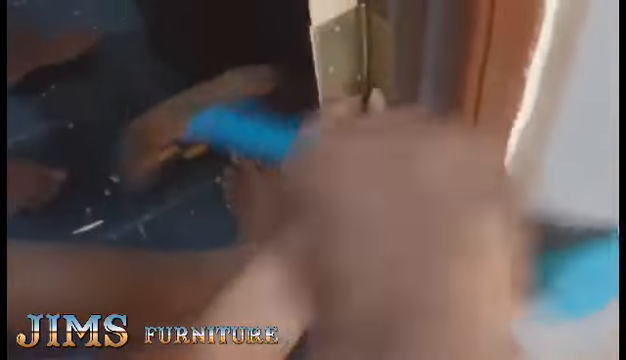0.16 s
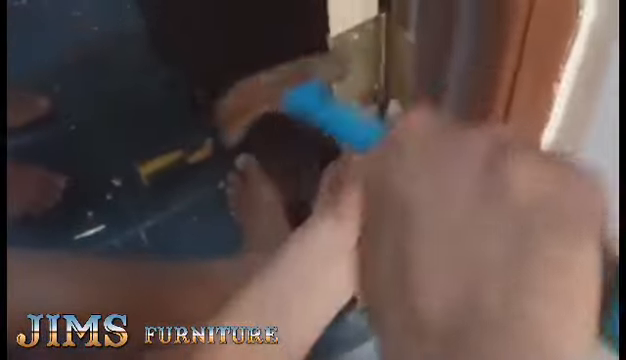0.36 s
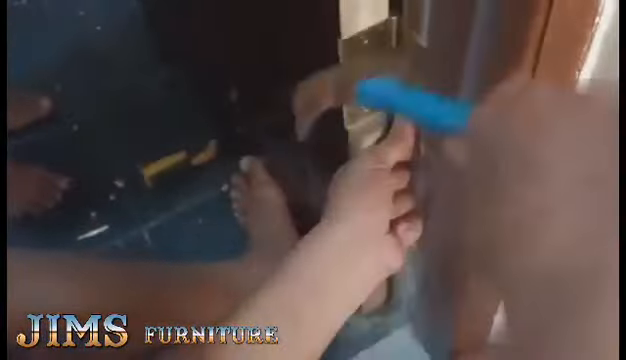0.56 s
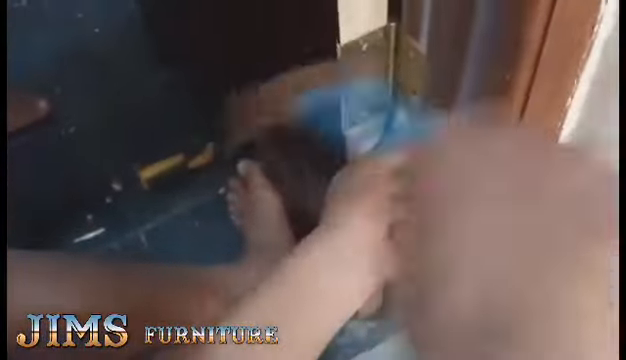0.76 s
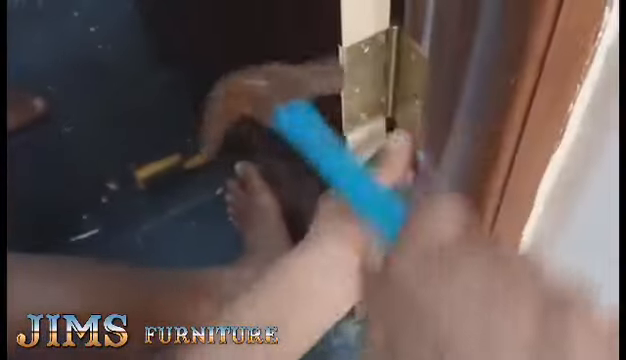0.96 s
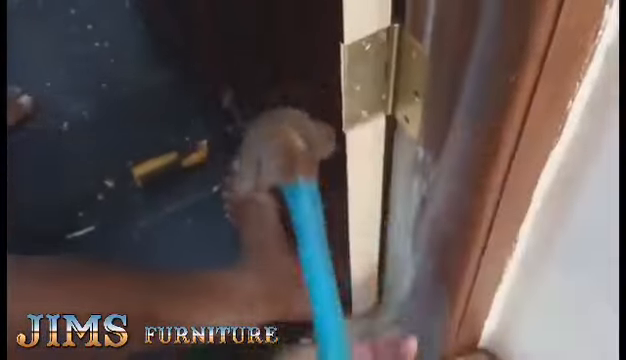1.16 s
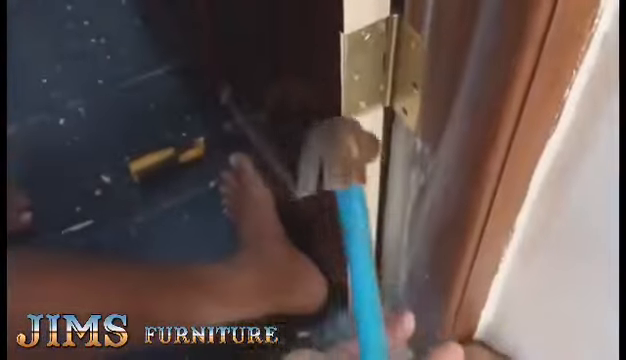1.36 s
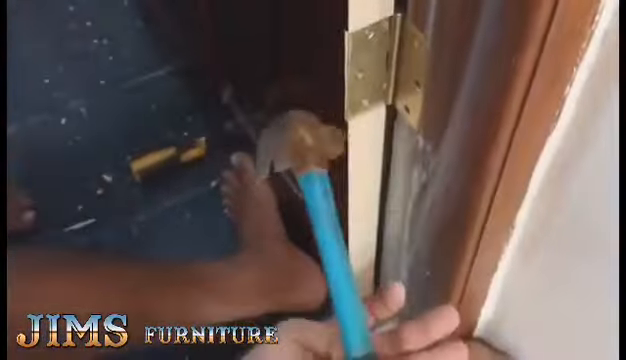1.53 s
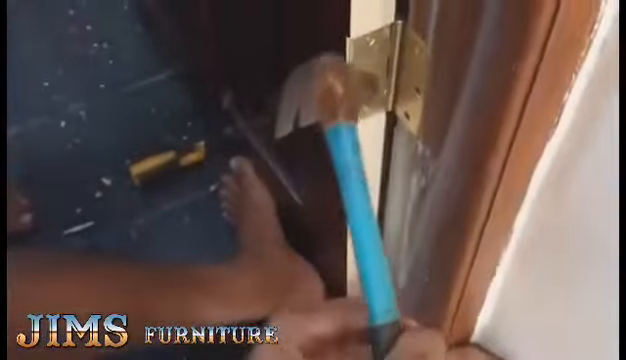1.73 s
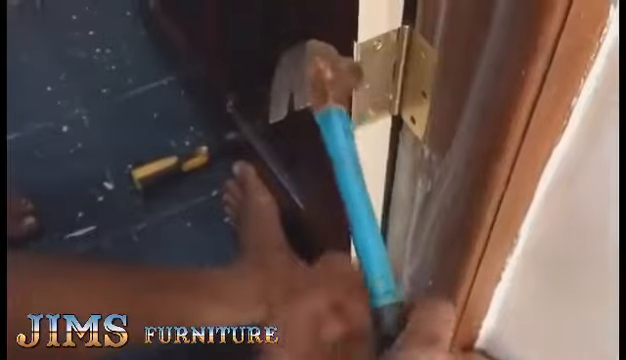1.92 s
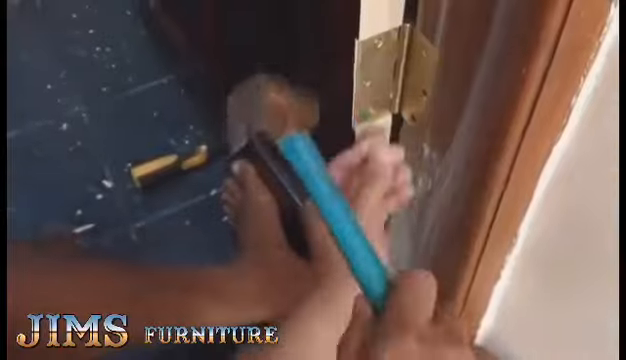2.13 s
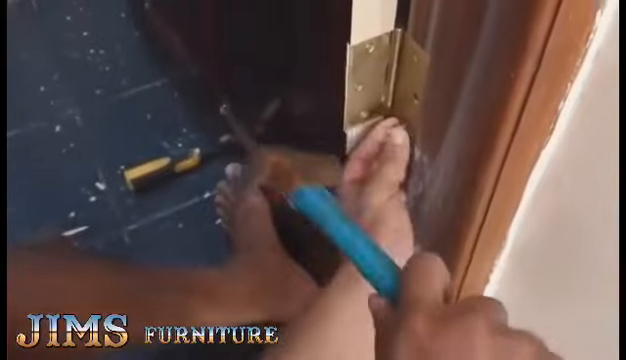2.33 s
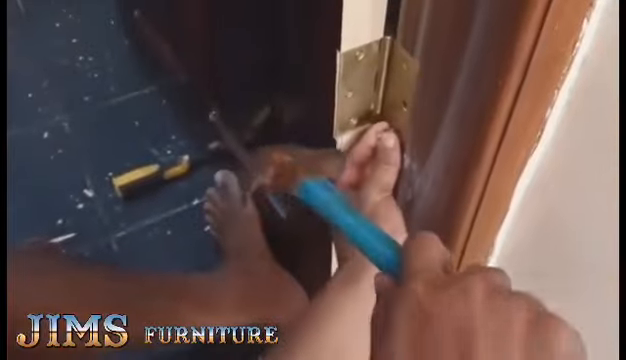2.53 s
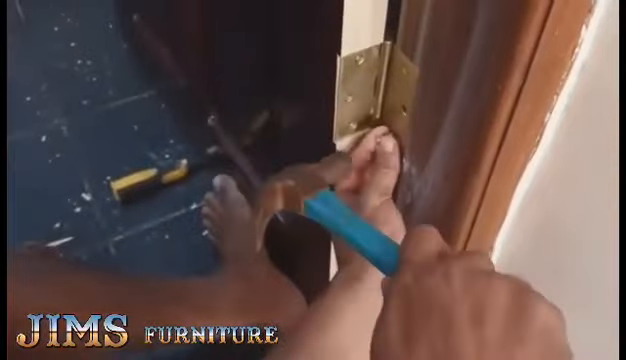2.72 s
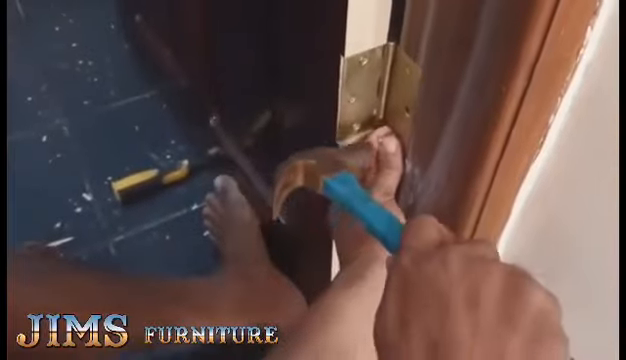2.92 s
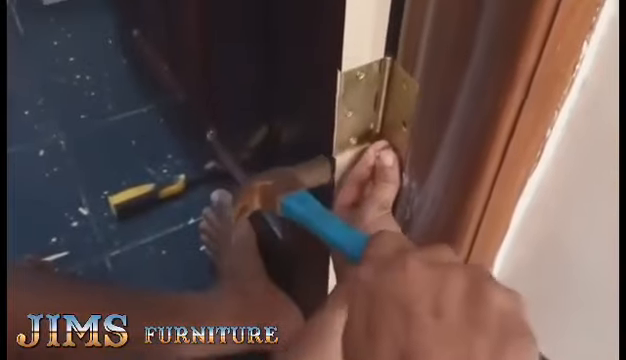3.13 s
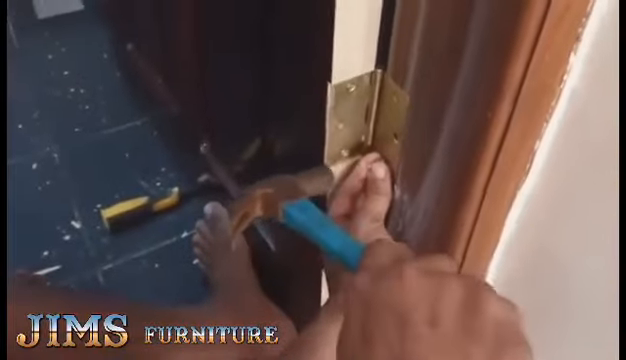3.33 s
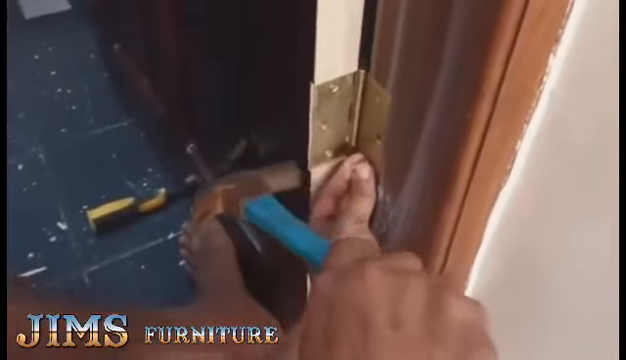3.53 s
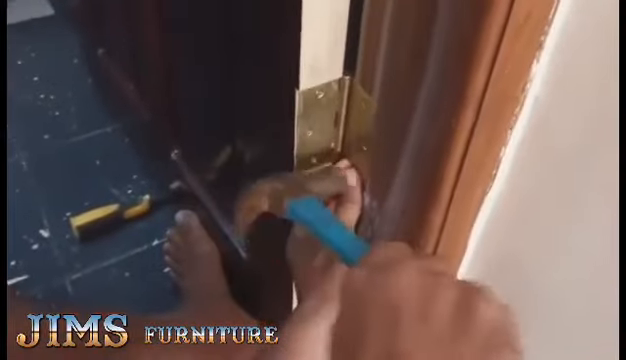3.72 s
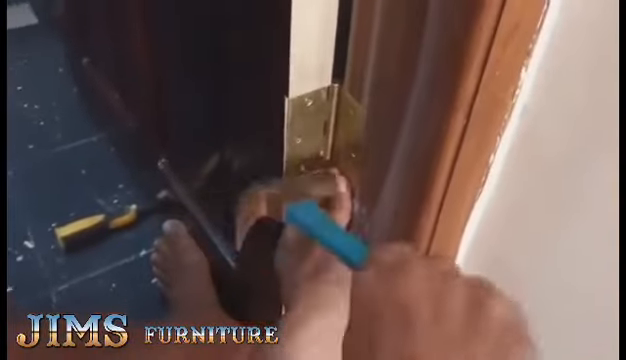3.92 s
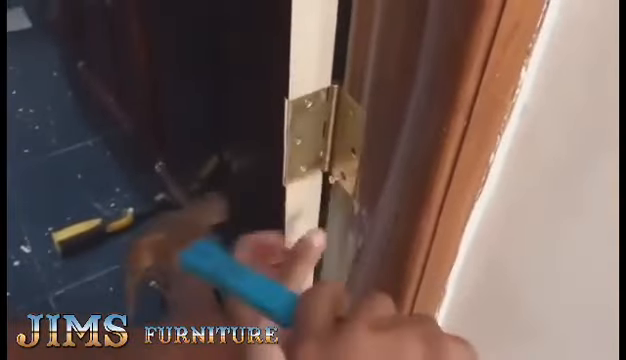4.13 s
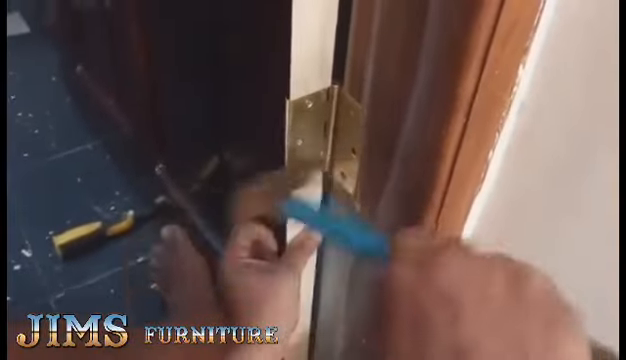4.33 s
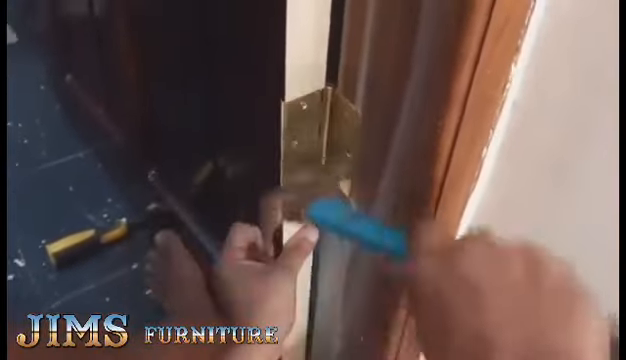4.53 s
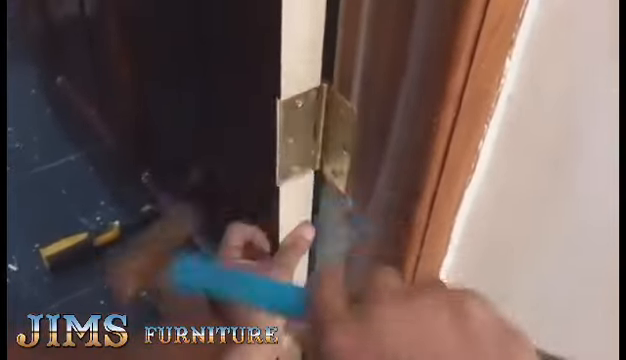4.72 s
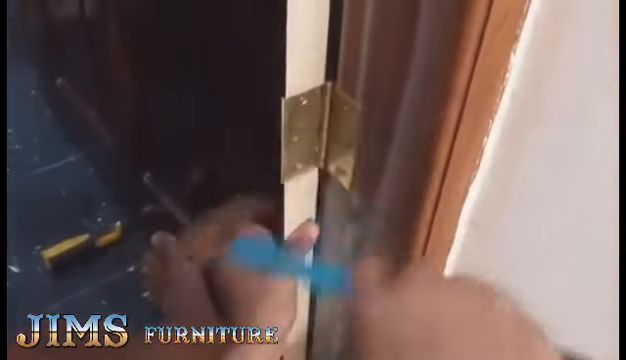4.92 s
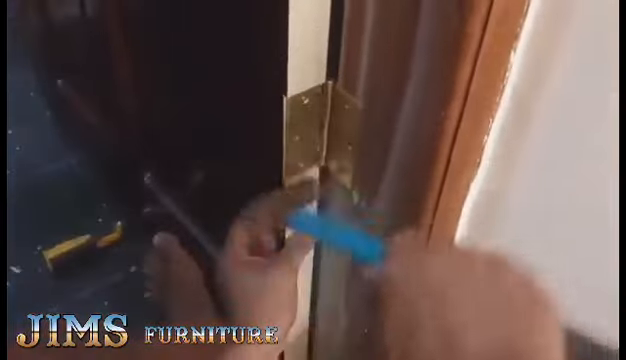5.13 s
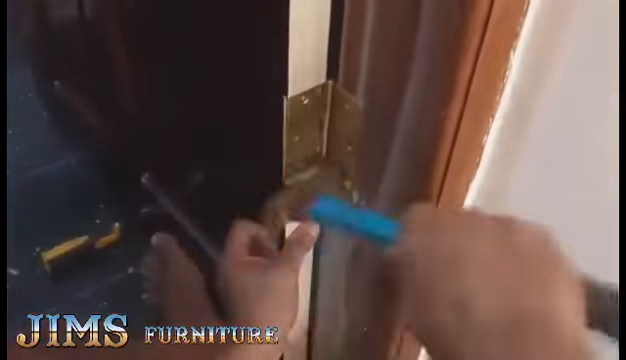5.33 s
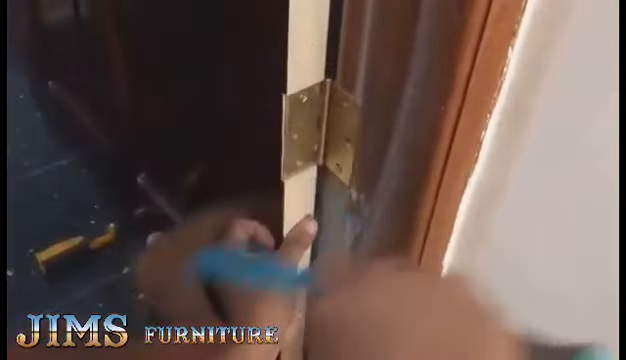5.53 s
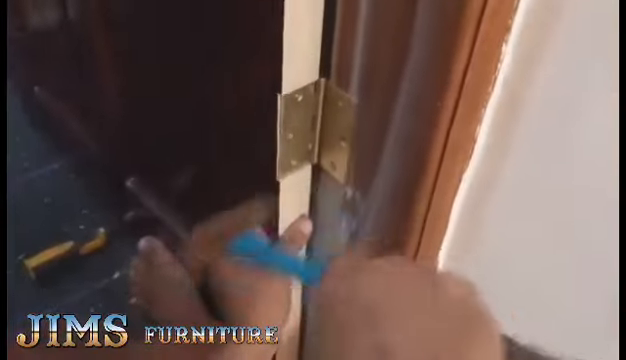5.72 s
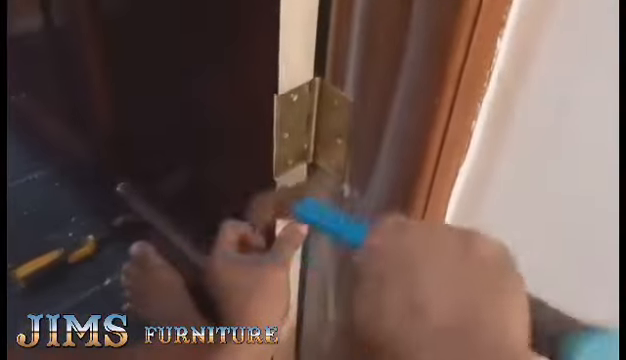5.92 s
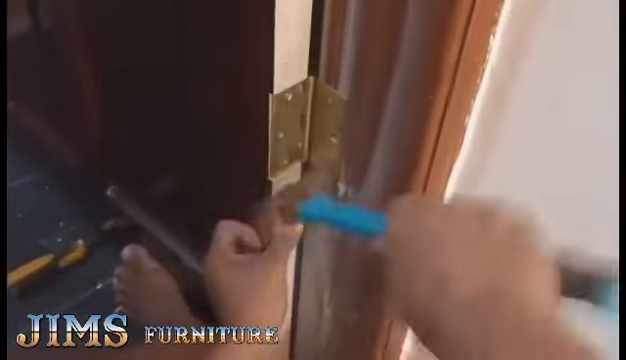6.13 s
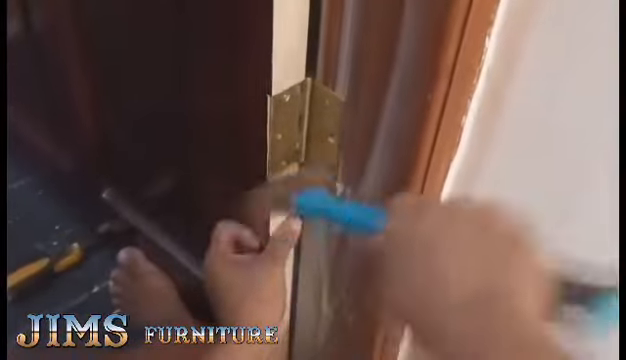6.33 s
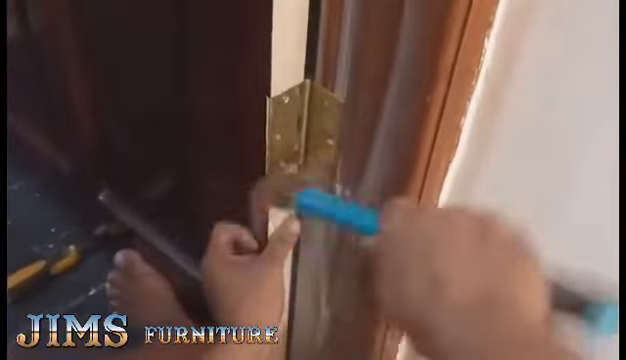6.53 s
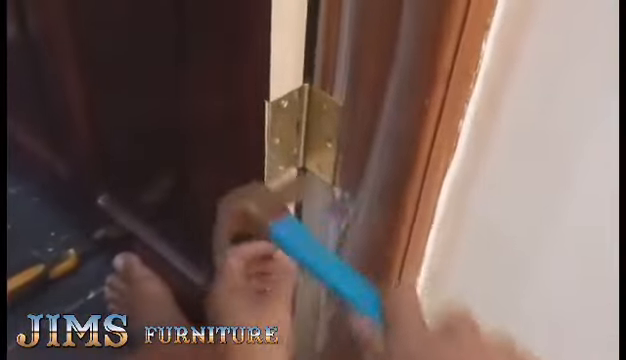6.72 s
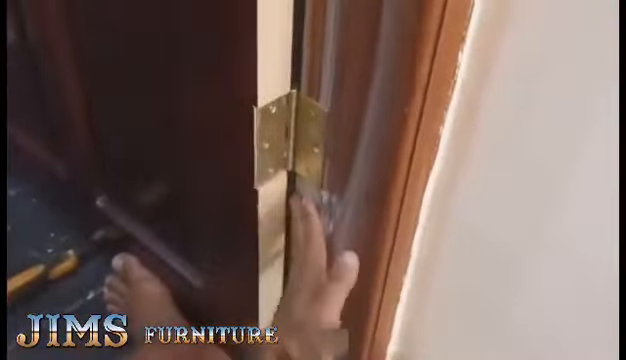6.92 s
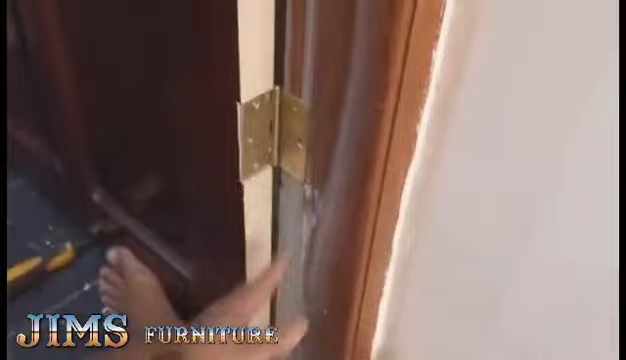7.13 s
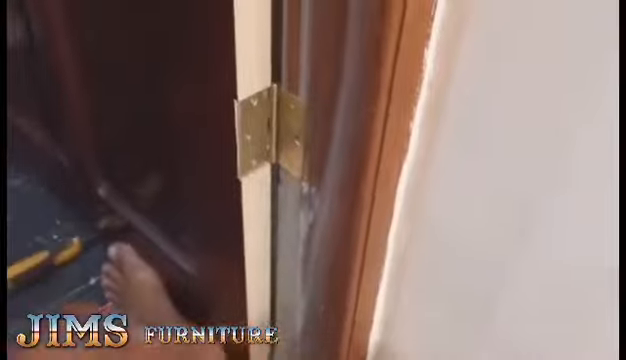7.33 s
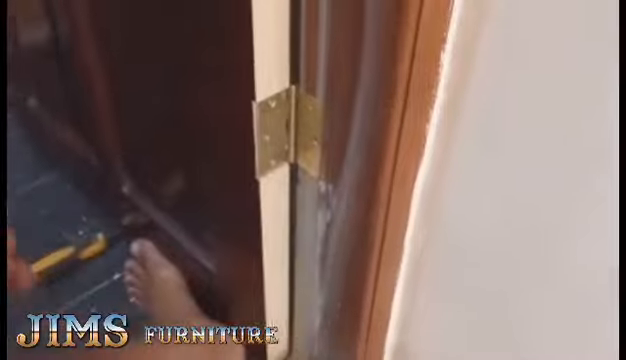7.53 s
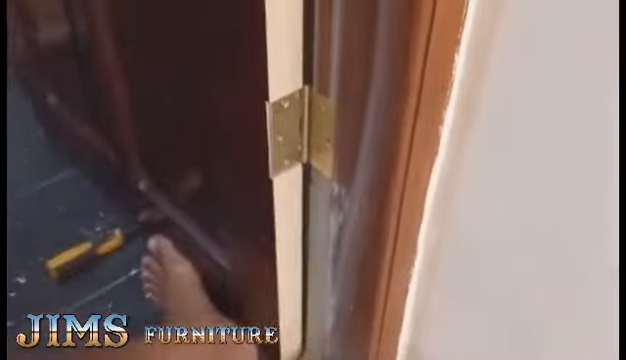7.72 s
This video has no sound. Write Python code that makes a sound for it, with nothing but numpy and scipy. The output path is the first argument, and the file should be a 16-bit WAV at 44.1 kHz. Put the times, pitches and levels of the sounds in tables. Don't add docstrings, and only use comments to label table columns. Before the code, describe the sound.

Close to a phone microphone, a hammer lands three loud cracking blows on a nail in a wooden door. After more than a second of near quiet, faint woody taps set the nail, then duller hits grow into a regular run of hard, steel-edged blows with bounces. Short, lumpy room echoes follow each; the end is faint airy hiss with a low wavering hum.

```python
import sys
import numpy as np
from scipy import signal
from scipy.fft import rfft, irfft, next_fast_len
from scipy.io import wavfile
from scipy.ndimage import uniform_filter1d

SR = 44100
rng = np.random.default_rng(int(sys.argv[2]) if len(sys.argv) > 2 else 0)


def to_wav(s):
    ch = np.atleast_2d(s).T
    pcm = np.round(np.clip(ch, -1, 1) * 32767)
    wavfile.write(sys.argv[1], SR, pcm.astype(np.int16))


def volts(x):
    e = np.asarray(x, float) / 20
    return 10 ** e


N = 346626

# (frequency [Hz], level [dB], t60 [s])
DOOR_MODES = [(189, -17, 0.064), (237, -27, 0.028), (486, -7, 0.021), (598, -1.8, 0.06), (770, -6.5, 0.021),
              (1017, -3.5, 0.017), (1610, -14.5, 0.11), (2150, -9.5, 0.0029)]
# (frequency [Hz], density [dB per Hz])
BLOW_ECHO_COLOUR = [(24, -56), (40, -24.5), (154, -19.5), (222, -3.5), (329, -11.5), (442, -8.5), (510, -8),
                    (605, 1), (730, -9.5), (2990, -19), (7970, -32), (10200, -28), (11500, -30.5),
                    (14000, -109)]


def level(x, db):
    return x * volts(db) / np.sqrt(np.mean(x ** 2))


def on_log_axis(table, hz):
    f, v = np.transpose(table)
    return np.interp(np.log(np.maximum(hz, 1)), np.log(f), v)


def walk(rate, size):
    k = int(SR / rate)
    steps = np.repeat(rng.standard_normal(size // k + 1), k)
    return 1.6 * uniform_filter1d(steps, k)[:size]


def stereo_noise(colour, likeness, tilt_db, size):
    hz = np.fft.rfftfreq(size, 1 / SR)
    mid, side = rfft(rng.standard_normal((2, size)))
    alike = np.clip(on_log_axis(likeness, hz), -1, 1)
    octaves = np.log2(np.clip(hz / 700, 1, 4.5))
    gain = volts(on_log_axis(colour, hz) + tilt_db * octaves)
    pair = np.sqrt(1 + alike) * mid + np.sqrt(1 - alike) * side * np.array([[1], [-1]])
    return hz, pair * gain / np.sqrt(2 * np.mean(gain ** 2))


def bands(hz, spectrum, centres):
    for one in np.eye(len(centres)):
        share = on_log_axis(np.transpose([centres, one]), hz)
        yield irfft(spectrum * share, 2 * len(hz) - 2)


def add(out, s, sound):
    i = int(s * SR)
    part = sound[:, max(-i, 0):N - i]
    out[:, max(i, 0):max(i, 0) + part.shape[1]] += part


def workshop():
    # (frequency [Hz], density [dB per Hz])
    air_colour = [(20, -40.5), (32, -16.5), (70, -2.5), (230, -7.5), (373, -8), (1070, -17.5),
                  (1350, -19.5), (4400, -24.5), (7000, -33.5), (8200, -41), (10400, -29), (12800, -40.5),
                  (14000, -56)]
    # (frequency [Hz], left-right likeness)
    air_likeness = [(60, 1), (130, 0.93), (280, 0.85), (610, 0.32), (1330, -0.05), (2900, 0.085),
                    (6290, -0.011), (13700, 1)]
    # (time [s], level [dB])
    air_swell = [
        (1.05, 1.5),
        (1.95, 0.8),
        (2.15, -2),
        (6.85, 0.1),
        (7.25, 1.5),
        (7.55, -0.5),
        (7.86, -0.5),
    ]
    # (start [s], length [s], frequency [Hz], level [dB])
    hum_spells = [(0.947, 0.61, 117.8, -64.5), (1.76, 0.17, 154, -73), (2.022, 0.18, 149.7, -65),
                  (2.29, .15, 153, -66.5), (3.235, 0.21, 139, -59), (3.507, .1, 140, -66),
                  (3.645, .16, 77.9, -58.5), (6.901, 0.064, 133, -78), (7.1, .11, 143.4, -65),
                  (7.512, .12, 140.7, -60.5), (7.68, 0.15, 140.6, -63.5)]
    idle_db, fade_s = -80.5, 0.025

    t = np.arange(N) / SR
    hz, spectrum = stereo_noise(air_colour, air_likeness, 0, size=next_fast_len(N // 2 + 1) * 2)
    centres = 41 * 2 ** np.arange(0, 8.1, .8 / 1.2)
    air = sum(band[:, :N] * volts(2.0 * walk(9, size=N)) for band in bands(hz, spectrum, centres))
    air = level(air, -64) * volts(np.interp(t, *np.transpose(air_swell)))

    start, length, hum_hz, hum_db = np.transpose(hum_spells)[:, :, None]
    inside_s = np.minimum(t - start, start + length - t)
    spell = np.clip(inside_s / fade_s + .5, 0, 1)
    pitch = np.interp(t, np.c_[start, start + length].ravel(), np.c_[hum_hz, hum_hz].ravel())
    turn = np.cumsum(pitch * (1 + 0.071 * walk(25, size=N))) * 2 * np.pi / SR
    spell_db = (spell * (hum_db - idle_db)).max(axis=0)
    hum = np.sqrt(2) * volts(idle_db + spell_db + 1.2 * walk(36, size=N))
    return air + hum * np.array([np.sin(turn), volts(-2.0) * np.sin(turn + 0.87)])


def echo(colour, echo_db, hold_s, tilt_db, build_s, tail_share=1):
    # (frequency [Hz], t60 [s])
    room_t60 = [(60, 0.36), (200, 0.33), (600, 0.29), (1500, 0.29), (4000, 0.29), (8000, 0.22),
                (12000, 0.24)]
    # (frequency [Hz], left-right likeness)
    room_likeness = [(60, 0.99), (130, 0.92), (280, 0.82), (610, 0.56), (1330, 0.071), (2900, -0.11),
                     (6290, 0.3), (13700, -0.55)]

    t = np.arange(32768) / SR
    hz, spectrum = stereo_noise(colour, room_likeness, tilt_db, size=len(t))
    clumps_db = np.interp(hz, np.arange(200) * 90, 3.4 * rng.standard_normal(200))
    spectrum = spectrum * volts(clumps_db * (hz > 850))
    gate_db = -9 * np.clip((t - .26) / 0.028, 0, 1)
    centres, t60 = np.transpose(room_t60)
    tail = 0
    for band, hz_mid, s in zip(bands(hz, spectrum, centres), centres, t60):
        gate_share = 0.36 if hz_mid < 300 else 1
        tail = tail + band * volts(-60 * t / (s * tail_share) + gate_db * gate_share)
    knee_s = 0.02
    recovery_db = -210 * knee_s * np.logaddexp(-t / knee_s, -hold_s / knee_s)
    build = 1 - np.exp(-t / build_s)
    return tail * build * volts(echo_db + recovery_db + 1.0 * walk(90, size=len(t)))


def thud(peak_db, hz):
    t = np.arange(8192) / SR
    swing = np.sin(2 * np.pi * hz * t + np.array([[0.75], [-0.75]]))
    return volts(peak_db + 9.5) * swing * (1 - np.exp(-t / 0.00044)) * volts(-60 * t / 0.075)


def shudder(out):
    # (time [s], peak level [dB])
    thuds = [
        (0.146, -43),
        (0.513, -41),
        (3.339, -58),
        (3.606, -54),
        (3.821, -61),
        (4.744, -30.5),
        (4.994, -37),
        (5.249, -33),
        (5.786, -35.5),
        (6.048, -28),
    ]
    for s, peak_db in thuds:
        add(out, s, thud(peak_db, 116))


def crack(t, lo_hz, hi_hz, t60):
    band = signal.butter(2, [lo_hz, hi_hz], "band", fs=SR, output="sos")
    return signal.sosfilt(band, rng.standard_normal((2, len(t)))) * volts(-60 * t / t60)


def ring(modes, t, scatter_db):
    hz, db, t60 = np.transpose(modes)[:, :, None]
    chance = rng.standard_normal((4, len(modes), 1))
    fade = volts(db + scatter_db * chance[0] - 60 * t / t60)
    turn = 2 * np.pi * (hz * (1 + 0.025 * chance[1]) * t + chance[2])
    lead = np.clip(hz / 2500, 0, 2) * chance[3]
    return np.array([(fade * np.sin(turn + side * lead)).sum(axis=0) for side in (.5, -.5)])


def contact(wood, peak_db, steel_db, rise_s, clamp_db=0):
    # (frequency [Hz], level [dB], t60 [s])
    steel_modes = [(3330, -9, .02), (4012, 1.5, 0.045), (4416, 9, 0.024), (4790, -5, 0.12),
                   (5160, 4, 0.023), (5575, -2, 0.097), (6050, 1, 0.056), (7000, -16, 0.028),
                   (7220, -0.5, 0.021), (9100, -14.5, .025), (10200, -5.5, 0.059), (11400, -18, 0.09),
                   (10700, -4, 0.024), (12000, -15, 0.062)]

    t = np.arange(4096) / SR
    rise = 1 - np.exp(-(t / rise_s) ** 2)
    crack_db = 5.5 + 0.67 * (max(steel_db, -27) + 19.0)
    body = ring(wood, t, scatter_db=2.5) + volts(crack_db) * crack(t, lo_hz=440, hi_hz=2470, t60=0.078)
    hiss = crack(t, lo_hz=2480, hi_hz=11400, t60=0.034)
    steel = ring(steel_modes, t, scatter_db=3.0) + volts(13) * hiss
    tick = crack(t, lo_hz=10900, hi_hz=14100, t60=0.017)[0] * np.array([[1], [-.7]])
    steel = steel + volts(-17.5) * np.abs(steel).max() * tick / np.abs(tick).max()
    rise = rise * volts(clamp_db * (1 - np.exp(-(t / 0.0037) ** 2)))
    hit = rise * (body / np.abs(body).max() + volts(steel_db + 12.5) * steel / np.abs(steel).max())
    return volts(peak_db) * hit / np.abs(hit).max()


def rebounds(out):
    # (time [s], peak level [dB], steel minus wood [dB])
    falls = [(0.162, -18.5, -28), (0.171, -21.5, -28), (0.531, -1, -12), (3.86, -33, -30.5),
             (4.225, -16.5, -33), (4.484, -12.5, -36), (4.762, -14, -31), (5.014, -11.5, -38.5),
             (5.024, -25.5, -37), (5.538, -6, -15.5), (5.608, -13, -29), (5.677, -21, -24.5),
             (6.142, -16.5, -34), (6.203, -25.5, -8.5), (6.379, -10, -32.5), (6.466, -11.5, 1),
             (6.535, -16, -12)]
    for s, peak_db, steel_db in falls:
        add(out, s - .003, contact(DOOR_MODES, peak_db - 3.5, steel_db - 4.5, rise_s=0.0035))


def taps(out):
    # (time [s], peak level [dB], steel minus wood [dB], echo level [dB], wood pitch [Hz])
    light_taps = [
        (2.399, -41, -18, -51.5, 911),
        (2.637, -35.5, -17.5, -51.5, 806),
        (2.702, -52, -24, -78, 1530),
        (2.959, -34, -36, -44, 830),
        (3.011, -36.5, -44, -59, 837),
        (3.169, -35, -37, -54, 1077),
        (3.339, -26, -9.5, -38, 675),
    ]
    # (frequency [Hz], level [dB], t60 [s])
    frame_modes = [(582, 0, 0.059), (784, 2.1, 0.055), (924, -7, 0.04), (1112, -3, 0.05), (1477, -3, 0.046),
                   (1820, -14, 0.054)]
    # (frequency [Hz], density [dB per Hz])
    tap_echo = [(250, -27), (520, -12), (790, 4.5), (1050, -7), (1500, -15), (2500, -22.5), (5500, -25.5),
                (8500, -36.5), (10500, -36.5), (13000, -51)]

    for s, peak_db, steel_db, echo_db, hz in light_taps:
        stretch = hz / 790
        tilt_db = 0.33 * (steel_db + 25)
        wood = np.array(frame_modes) * [stretch, 1, 1]
        add(out, s - .002, contact(wood, peak_db, steel_db, rise_s=0.0028))
        colour = [(f * stretch if f < 2000 else f, db) for f, db in tap_echo]
        add(out, s, echo(colour, echo_db + 3, .02, tilt_db, build_s=0.00067, tail_share=0.66))


def duck(s, hold_s, echo_db):
    t = np.arange(N) / SR - s
    down = np.clip(1 + t / 0.006, 0, 1) * np.clip((echo_db + 40.5) / 15, 0, 1)
    held = np.clip(1 - (t - hold_s) / .09, 0, 1)
    return volts(-20 * down * held)


def blows(out):
    # (time [s], peak level [dB], steel minus wood [dB], gain hold [s], echo brightness [dB per octave])
    hard_blows = [(0.148, -5, -17, 0.15, -0.73), (0.517, -5, -10.5, 0.16, 2.4),
                  (0.737, -1, -17.5, 0.15, 1.55), (3.606, -16, -28, 0.033, -3),
                  (3.823, -12, -30.5, 0.071, 1.3), (4.187, -24, -29.5, 0.1, 3.5),
                  (4.466, -16, -22.5, 0.12, -1.2), (4.744, -5.5, -19, 0.12, 0),
                  (4.997, -4.5, -21.5, 0.13, 0.35), (5.249, -5, -14.5, 0.14, 1.7),
                  (5.512, -5.5, -17.5, 0.15, 0.9), (5.789, -3, -11.5, 0.14, 1.04),
                  (6.049, -2, -14.5, 0.15, 0.1), (6.286, -2, -13.5, 0.14, 0),
                  (6.447, -1.5, -12.5, 0.16, 0.8)]
    # (frequency [Hz], level [dB], t60 [s])
    soft_door = [(211.5, -29, 0.21), (244.6, -13, 0.023), (470, 4, 0.019), (594, 0, 0.15),
                 (650, 1.5, 0.036), (967, 5.5, 0.02), (1155, -9, 0.12), (1410, 14, 0.0086)]
    # (frequency [Hz], density [dB per Hz])
    soft_echo = [(24, -59), (40, -42), (210, 1), (346, -12), (608, -1.5), (1020, -16), (1660, -17.5),
                 (4530, -35), (8790, -42.5), (10700, -34.5), (12400, -86), (14000, -97)]

    for s, peak_db, steel_db, hold_s, tilt_db in hard_blows:
        echo_db = -25.5 - 13.5 * np.exp(-hold_s / 0.059)
        out = out * duck(s, hold_s, echo_db)
        soft = 3.5 < s < 4.3
        wood = soft_door if soft else DOOR_MODES
        colour = soft_echo if soft else BLOW_ECHO_COLOUR
        add(out, s - .002, contact(wood, peak_db, steel_db, rise_s=0.002, clamp_db=-5.5))
        add(out, s, echo(colour, echo_db, hold_s, tilt_db, build_s=.018 if soft else .009))
    return out


def scene():
    out = workshop()
    add(out, 0, echo(BLOW_ECHO_COLOUR, echo_db=-24.5, hold_s=0.013, tilt_db=-3.8, build_s=0.0007))
    taps(out)
    out = blows(out)
    rebounds(out)
    shudder(out)
    return out


def starve(x):
    # (frequency [Hz], level [dB])
    drop_below = [(1500, -46), (2500, -47), (4000, -49), (6000, -48), (8300, -41), (10500, -49), (12000, -50),
                  (14000, -42)]

    hz, _, z = signal.stft(x, SR, nperseg=1024, noverlap=768)
    power = np.mean(np.abs(z) ** 2, axis=0) + 1e-18
    band = (np.sqrt(hz) / 1.7).astype(int)
    band_db = np.array([10 * np.log10(power[band == b].mean(axis=0)) for b in range(band[-1] + 1)])
    held = np.repeat(rng.standard_normal(band_db.shape), 4, axis=1)
    budget_db = 12.0 * uniform_filter1d(held, size=9, axis=1)[:, :z.shape[-1]]
    heard_db = np.minimum(band_db[band], 10 * np.log10(power) + 2) + budget_db[band]
    whole_db = 5 * np.log10(power.sum(axis=0) * power[hz > 1000].sum(axis=0)) + 3.5
    margin_db = heard_db - whole_db - on_log_axis(drop_below, hz)[:, None]
    margin_db -= np.outer(hz > 11500, np.clip(.4 * (whole_db + 55), -6, 9))
    margin_db -= 25 * (budget_db[band] < -8)
    margin_db += 14 * (np.diff(whole_db, prepend=0) > 5)
    passed = 1 / (1 + np.exp(np.clip(-margin_db / .5, -30, 30)))
    keep = np.where(hz[:, None] > 1500, passed, 1)
    return signal.istft(z * keep, SR, nperseg=1024, noverlap=768)[1][:, :N]


def top_cut(x):
    return signal.sosfilt(signal.butter(12, 14270, fs=SR, output="sos"), x)


def record(dry):
    x = np.tanh(2.244 * dry) / 2.029
    x = signal.sosfilt(signal.butter(6, 13436, fs=SR, output="sos"), x)
    x = signal.sosfilt(signal.butter(2, 45, "high", fs=SR, output="sos"), x)
    x = starve(x)
    return top_cut(x)


dry = scene()
out = record(dry)
to_wav(out)
```